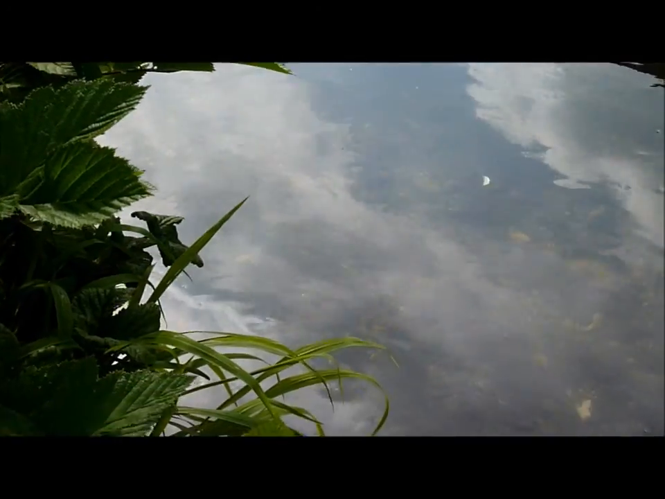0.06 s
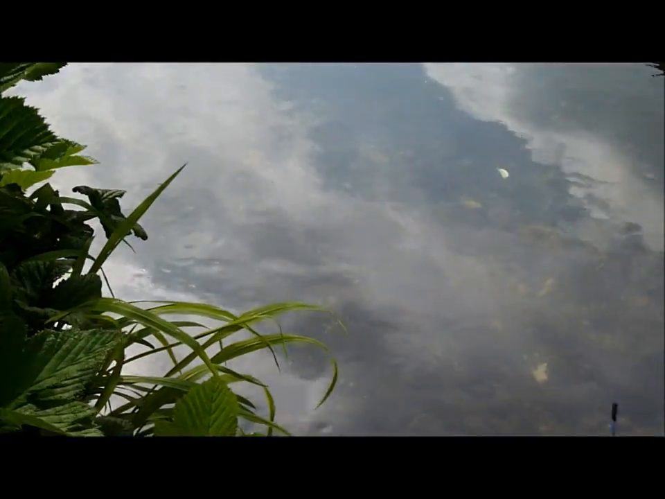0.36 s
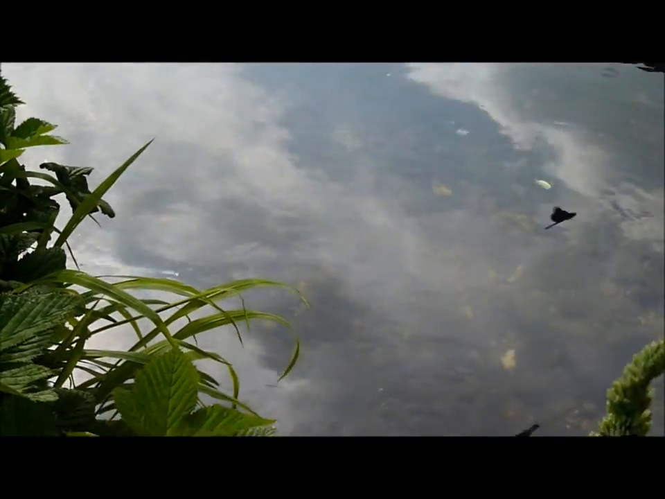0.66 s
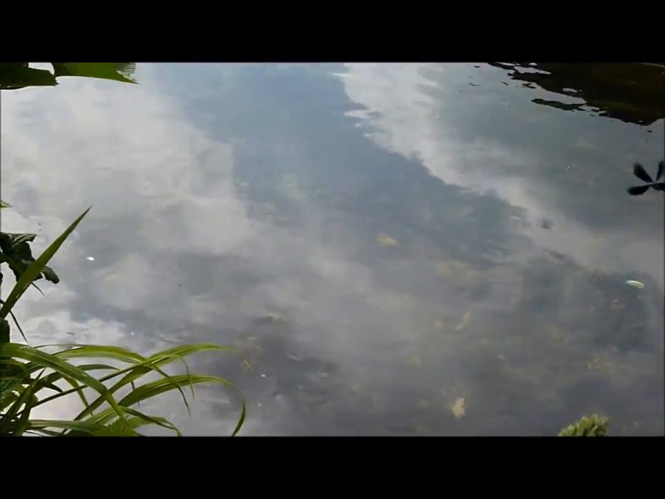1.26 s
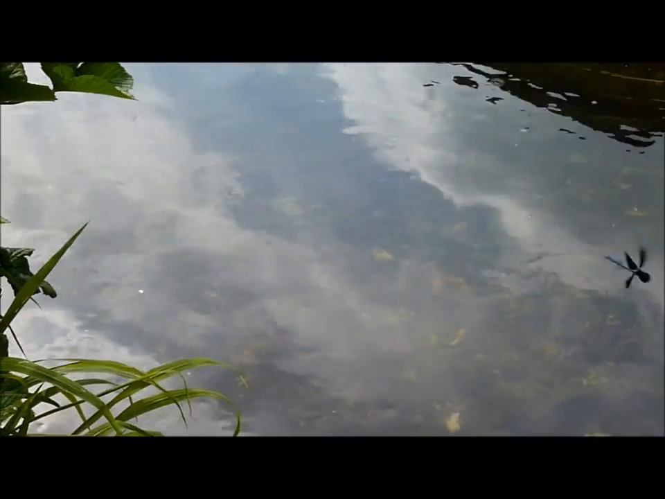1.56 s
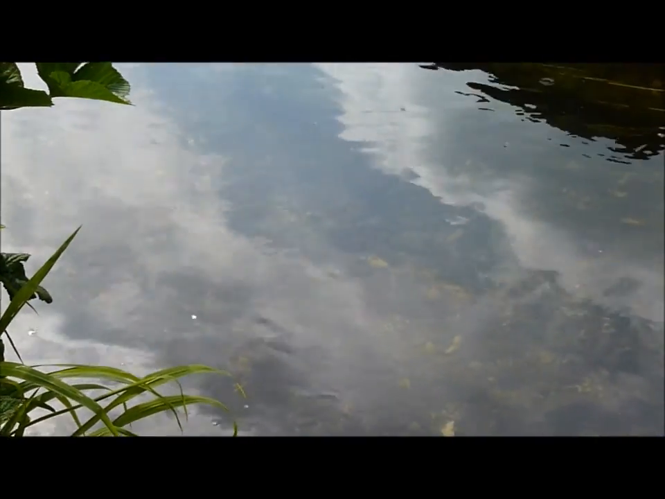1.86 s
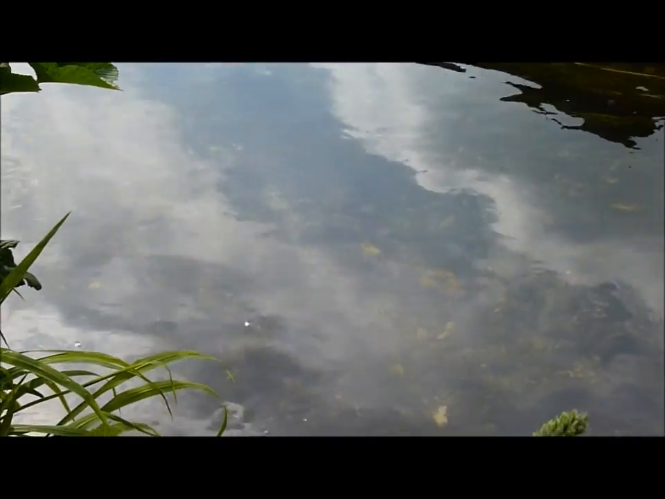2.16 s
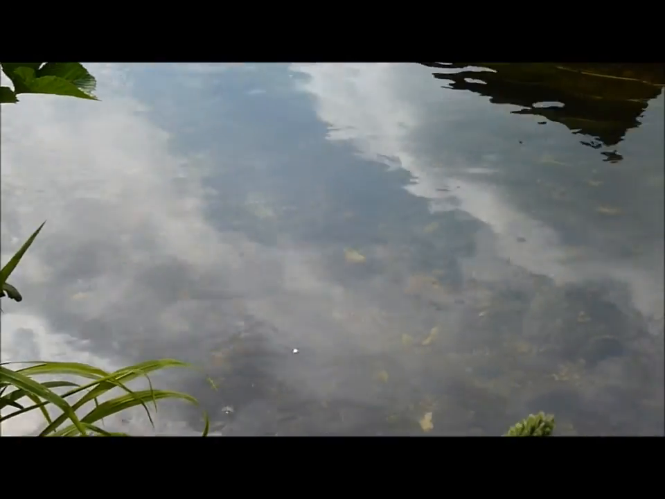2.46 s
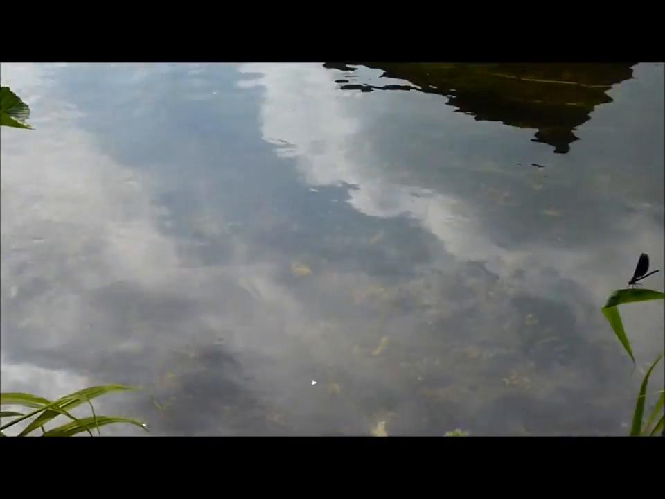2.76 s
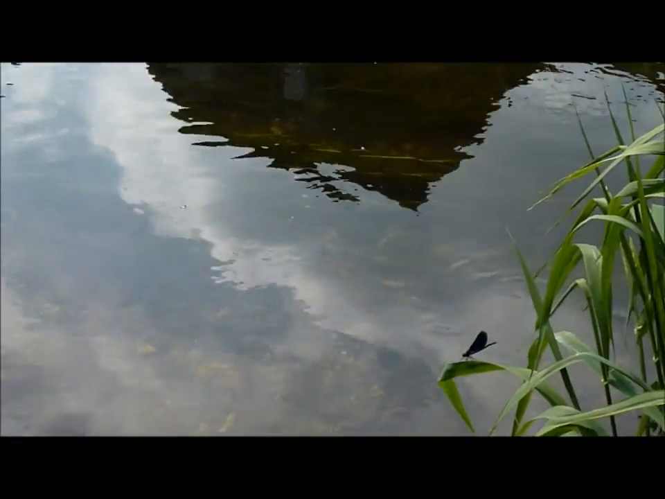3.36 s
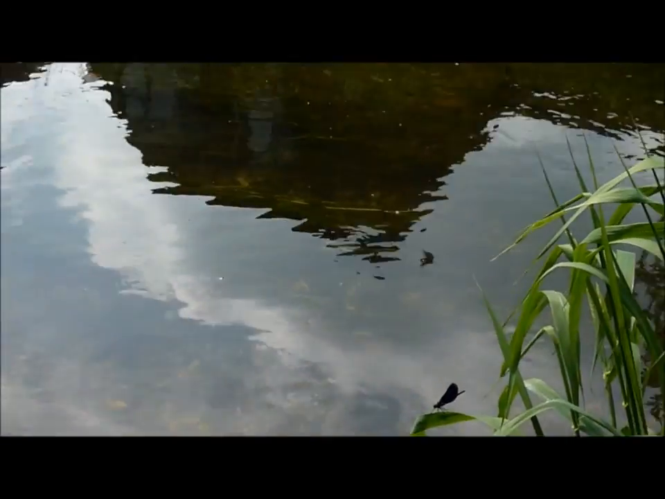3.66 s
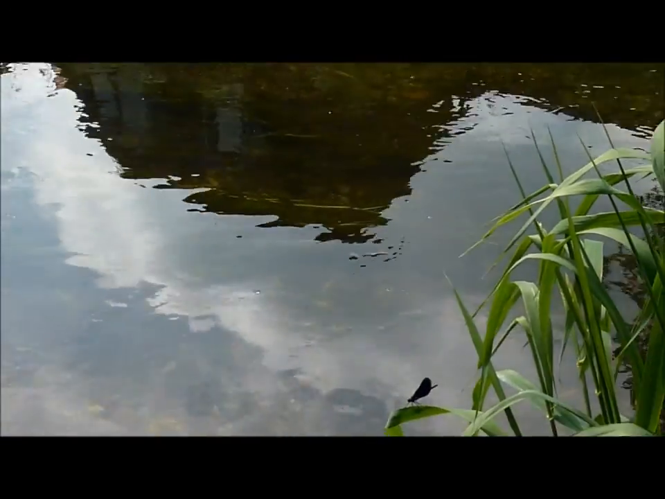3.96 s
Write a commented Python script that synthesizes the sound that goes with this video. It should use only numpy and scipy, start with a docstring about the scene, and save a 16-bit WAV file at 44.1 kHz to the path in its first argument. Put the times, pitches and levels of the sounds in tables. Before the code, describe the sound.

On a river bank, a songbird right of centre sings a held buzzy whistle and rapid falling notes over a low rush of water and far traffic. Afterwards twigs tick near the microphone and another bird chirps on the left.

```python
"""On a river bank: water and distant traffic rush throughout, and small birds call thinly from far off.
About a second in, a songbird right of centre gives a soft rising whistle, a long buzzing tone
and a run of quick falling notes, which echo from the trees and the far bank.
Then twigs tick close to the microphones, and just after three seconds a second bird chirps on the left."""
import sys
import numpy as np
from scipy import signal
from scipy.io import wavfile

SR = 44100
rng = np.random.default_rng(int(sys.argv[2]) if len(sys.argv) > 2 else 0)


def dump(signal):
    """Clip the signal to [-1, 1] and save it as 16-bit WAV at the path in sys.argv[1]."""
    limited = np.clip(np.atleast_2d(signal).T, -1, 1)
    pcm = np.round(limited * 32767).astype(np.int16)
    wavfile.write(sys.argv[1], SR, pcm)


N = 176400
T = np.arange(N) / SR


def from_db(db):
    """Decibels to gain."""
    return 10 ** (np.asarray(db) / 20)


def rms_one(x):
    """Scale to unit power."""
    return x / np.sqrt(np.mean(x ** 2) + 1e-20)


def in_time(rows):
    """Each column of a curve, read at every sample."""
    times, *columns = np.transpose(rows)
    return [np.interp(T, times, column) for column in columns]


def at_hz(points, hz):
    """Read a spectrum on a log-frequency axis."""
    f, value = np.transpose(points)
    return np.interp(np.log(hz), np.log(f), value)


def drift(rate_hz):
    """Smooth random wander with a spread of 1."""
    step, settle = 20, 2000
    pole = np.exp(-2 * np.pi * step * rate_hz / SR)
    white = rng.standard_normal(N // step + settle + 2)
    slow = signal.lfilter([1], [1, -2 * pole, pole * pole], white)[settle:]
    return np.interp(np.arange(N) / step, np.arange(len(slow)), rms_one(slow))


def band_pass(x, low_hz, high_hz):
    """Keep the band between two frequencies."""
    return signal.sosfilt(signal.butter(2, [low_hz, high_hz], "band", fs=SR, output="sos"), x)


def gate(start, end, edge_s=0.0016):
    """Open between two times, with short ramps."""
    return np.clip(np.minimum(T - start, end - T) / edge_s, 0, 1)


def sine(hz):
    """A tone of unit power on a moving pitch."""
    return np.sqrt(2) * np.sin(2 * np.pi * np.cumsum(hz) / SR)


def glide(rows, waver_hz):
    """A pure whistled note along a pitch and level curve."""
    hz, db = in_time(rows)
    return sine(hz + waver_hz) * from_db(db) * gate(rows[0][0], rows[-1][0])


def pan(x, pan_db, lead_s=0):
    """Place a sound: positive values make it louder and earlier at the left microphone."""
    gains = from_db(np.array([[pan_db], [-pan_db]]) / 2)
    left, right = np.broadcast_to(x, (2, N))
    return np.array([left, np.interp(T - lead_s, T, right)]) * gains / gains.mean()


def bank_echo(x, t60_s=0.72, delay_s=0.0089):
    """Diffuse echo from trees and banks, different at each microphone."""
    t = T[:SR]
    tails = rng.standard_normal((2, SR)) * from_db(-60 * t / t60_s) * (t > delay_s)
    tails /= np.sqrt(np.sum(tails ** 2, axis=1, keepdims=True))
    return signal.fftconvolve(np.atleast_2d(x), tails, axes=1)[:, :N]


def far_bank_slap(x, delay_s=0.115, level_db=-18):
    """One distinct echo from across the river, alike at both microphones."""
    return from_db(level_db) * np.interp(T - delay_s, T, x.mean(axis=0))


def rush(level_db=-44, flicker_db=0.85):
    """Water and far traffic: third-octave bands of noise, each flickering slightly."""
    # spectral density of the rush: f/Hz, relative level/dB
    spectrum = [(20, -19.5), (36, -0.5), (50, -0.5), (70, 3), (110, 0.5), (160, -3), (255, -1.5), (330, -9),
                (450, -7.5), (700, -7), (1000, -4.5), (1350, -8), (2000, -16), (3000, -25), (4500, -28.5),
                (6000, -29.5), (7200, -30.5), (8200, -52.5)]
    # likeness at the two microphones: f/Hz, correlation/0-1
    likeness = [(30, 0.99), (120, 1), (600, 0.96), (1400, 0.94), (3000, 0.23), (7000, 0.13)]
    out, edges_hz = 0, 20 * 2 ** (np.arange(28) / 3)
    white = rng.standard_normal((2, 2, N))
    for k, (low, high) in enumerate(zip(edges_hz, edges_hz[1:])):
        mid, side = band_pass(white[k % 2], low, high)
        hz = np.sqrt(low * high)
        alike = np.clip(at_hz(likeness, hz), 0, 1)
        gain = from_db(at_hz(spectrum, hz) + flicker_db * drift(4.5))
        out += gain * (np.sqrt(1 + alike) * mid + np.sqrt(1 - alike) * side * [[1], [-1]])
    return from_db(level_db) * rms_one(out)


def engines(waver_hz=2.4, flicker_db=1.3):
    """Distant engines: two low tones, unsteady in pitch and level."""
    # engine hum: t/s, f/Hz, level/dB
    hum = [(0, 124.5, -58.5), (.9, 122, -62), (1.25, 122.3, -53.5), (1.6, 118, -55.5), (2.15, 113, -59.5),
           (2.9, 108, -66), (3.4, 107.8, -51.5), (3.8, 111.2, -49.5), (4, 112, -63)]
    # higher drone that swells briefly: t/s, f/Hz, level/dB
    drone = [(.5, 250.9, -70), (1.25, 255, -56.5), (1.55, 264.7, -54), (1.75, 262.7, -66),
             (2.5, 262.3, -63), (4, 258, -66.5)]
    return sum(sine(hz + waver_hz * drift(8)) * from_db(db + flicker_db * drift(2.6))
               for hz, db in (in_time(hum), in_time(drone)))


def far_birds(quaver_hz=110.3, flicker_db=3):
    """Small birds far off to the left: thin, broken, quavering calls, heard largely as echo."""
    # one curve a call: t/s, f/Hz, level/dB
    curves = [
        [(0, 7150, -64.5), (.12, 7030, -65), (.33, 6730, -68), (.65, 6600, -66.5)],
        [(1.0, 7520, -63), (1.1, 7130, -64.5), (1.4, 7250, -67.5), (1.48, 7340, -66)],
        [(1.57, 7300, -66), (1.61, 7260, -62), (1.64, 7200, -65.5)],
        [(2.25, 6960, -66), (2.4, 6920, -71.5), (2.52, 6720, -72)],
        [(2.69, 6900, -65), (2.74, 6780, -72), (2.79, 6570, -65)],
        [(2.8, 7570, -70), (2.88, 7250, -60), (2.94, 6940, -66.5)],
        [(2.99, 7340, -67), (3.03, 7100, -61), (3.07, 7090, -71)],
        [(3.09, 7400, -70), (3.13, 7250, -59), (3.16, 7200, -59)],
        [(3.22, 7620, -57), (3.25, 7300, -68), (3.275, 7200, -59)],
        [(3.335, 7510, -59.5), (3.37, 7270, -62.5), (3.4, 7200, -61)],
        [(3.78, 7150, -66), (3.85, 7040, -70.5), (4, 7050, -73.5)],
    ]
    quaver = quaver_hz * drift(60)
    calls = sum(glide(curve, quaver) for curve in curves) * from_db(flicker_db * drift(22))
    return pan(from_db(-1.5) * calls + from_db(-3) * bank_echo(calls), pan_db=5, lead_s=45e-6)


def twigs(decay_s=0.002):
    """Tiny dry snaps in the plants close to the microphones."""
    # twig ticks: t/s, level/dB, left minus right/dB
    ticks = [(2.581, -39.5, -3), (2.945, -42, -4), (3.421, -53, -3), (3.561, -50, -1), (3.778, -41, -7)]
    envelope = sum(pan(from_db(db) * (T >= start) * np.exp(-np.abs(T - start) / decay_s), pan_db)
                   for start, db, pan_db in ticks)
    crack = band_pass(rng.standard_normal((2, N)), 1800, 8000)
    return envelope * rms_one(crack)


def second_bird(rasp_hz=110):
    """One chirp of three quick, slightly rough whistled strokes."""
    # one curve a stroke: t/s, f/Hz, level/dB
    strokes = [
        [(3.14, 5320, -55), (3.149, 6200, -61.5), (3.156, 6150, -50)],
        [(3.159, 5300, -58), (3.165, 4534, -52), (3.172, 3950, -53)],
        [(3.191, 4050, -58), (3.207, 4430, -44.5), (3.214, 5040, -51), (3.219, 3970, -50), (3.228, 3520, -50)],
    ]
    return sum(glide(stroke, rasp_hz * drift(400)) for stroke in strokes)


def opening_whistle(rasp_hz=220, waver_hz=6):
    """The songbird starts with two soft raspy notes that overlap a rising whistle."""
    # one curve a soft note: t/s, f/Hz, level/dB
    soft_notes = [
        [(.94, 2200, -61.5), (.967, 2780, -61), (.98, 2300, -68)],
        [(.995, 2250, -61), (1.022, 2780, -61.5), (1.04, 2200, -53)],
    ]
    # rising whistle: t/s, f/Hz, level/dB
    whistle = [(.98, 1884, -66), (1.01, 1890, -57.5), (1.06, 1942, -62.5), (1.12, 2066, -53),
               (1.18, 2090, -45.5), (1.215, 2097, -52.5), (1.28, 2096, -58.5)]
    rasp = rasp_hz * drift(280)
    return glide(whistle, waver_hz * drift(40)) + sum(glide(note, rasp) for note in soft_notes)


def long_tone(buzz_hz=98, swing_hz=75.2, split_start_s=1.66, split_below_hz=185):
    """The songbird's held whistle buzzes as pitch and level flutter, and splits in two near its end."""
    # held tone: t/s, f/Hz, level/dB, buzz depth/0-1
    tone = [(1.305, 2260, -63, 0.2), (1.345, 2657, -45, 0.4), (1.385, 2680, -41, 0.67),
            (1.43, 2717, -42, 0.44), (1.485, 2670, -39.5, .15), (1.515, 2650, -42, .5),
            (1.61, 2618, -41, .65), (1.665, 2575, -38, 0.58), (1.698, 2564, -40.5, 0.64),
            (1.716, 2290, -48, 0.2)]
    start, end = tone[0][0], tone[-1][0]
    hz, db, depth = in_time(tone)
    flutter = sine(buzz_hz * (1 + 0.013 * drift(7.4))) / np.sqrt(2)
    pitch = hz + swing_hz * depth * flutter + 14 * drift(57)
    level = from_db(db + 0.79 * drift(40)) * (1 + depth * flutter)
    split = from_db(-12.5) * sine(pitch - split_below_hz) * gate(split_start_s, end)
    overtone = from_db(-31.5) * sine(2 * pitch)
    return level * gate(start, end) * (sine(pitch) + split + overtone)


def quick_notes(drop_s=0.0038, sag_hz_per_s=4000, hook_hz=1300, hook_s=0.0045):
    """The songbird's run: all notes hook down at the end; slurred ones first drop, weaken and sag."""
    # notes: start t/s, length/s, middle f/Hz, opening drop/Hz, level/dB
    notes = [(1.815, 0.038, 3410, -3, -52), (1.855, 0.049, 3450, 602, -53),
             (1.907, .045, 3570, 905.5, -50.5), (1.949, 0.048, 3575, 650, -52.5),
             (1.999, .045, 3640, 792, -54.5), (2.05, 0.049, 3720, 299, -54), (2.103, 0.045, 3570, -2, -58)]
    dip_db, dip_at_s, dip_width_s = 7, 0.016, 0.0099
    out, waver = 0, 25 * drift(150)
    for start, length, hz, drop_hz, db in notes:
        t = np.clip(T - start, 0, length)
        slurred = drop_hz > 0
        drop = drop_hz * np.exp(-t / drop_s)
        sag = sag_hz_per_s * (t - length / 2) * slurred
        hook = hook_hz * np.exp((t - length) / hook_s)
        dip = dip_db * np.exp(-((t - dip_at_s) / dip_width_s) ** 2) * slurred
        level = from_db(db - dip) * gate(start, start + length, edge_s=0.0045)
        out += level * sine(hz + drop - sag - hook + waver)
    return out


def pips(width_s=0.007, bend_hz=693, rasp_hz=262, lead_in_rasp_hz=305):
    """The songbird's upper voice dips in a short scratchy V between the quick notes."""
    # high lead-in to the first pip: t/s, f/Hz, level/dB
    lead_in = [(1.805, 6530, -63), (1.825, 6830, -55), (1.838, 7100, -51.5), (1.85, 6300, -54)]
    # bottom of each V: t/s, f/Hz, level/dB
    dips = [(1.852, 6170, -44.5), (1.903, 6450, -46.5), (1.951, 6720, -48), (1.998, 6700, -51),
            (2.047, 6720, -50), (2.096, 6750, -57.5)]
    out = glide(lead_in, lead_in_rasp_hz * drift(260))
    rasp = rasp_hz * drift(500)
    scratch = from_db(-11) * rms_one(band_pass(rng.standard_normal(N), 2600, 8000))
    for centre, hz, db in dips:
        away = np.minimum(np.abs(T - centre) / width_s, 2)
        voice = sine(hz + bend_hz * away ** 2 + rasp) * np.exp(-2 * away ** 2)
        out += (voice + scratch * np.exp(-away ** 2)) * from_db(db) * (away < 2)
    return out


def scene():
    """The birds, their echoes and the river bank as they reach the microphone pair."""
    song = pan(opening_whistle(), pan_db=-2) + pan(long_tone(), pan_db=-6, lead_s=-12e-6)
    run = pan(quick_notes() + pips(), pan_db=-6.5, lead_s=-31e-6)
    chirp = second_bird()
    echo = bank_echo(from_db(-15) * song + from_db(-5) * run + from_db(-9.5) * chirp)
    echo += far_bank_slap(song + run)
    surroundings = far_birds() + twigs() + rush() + engines()
    return surroundings + echo + pan(chirp, pan_db=11) + song + run


def record(dry):
    """The recorder has a narrow notch in the treble, then rolls off to a low cut-off."""
    notch_hz, notch_width_hz, roll_off_hz, cutoff_hz = 5420, 420, 7500, 8050
    notched = signal.lfilter(*signal.iirnotch(notch_hz, notch_hz / notch_width_hz, fs=SR), dry)
    dulled = signal.sosfilt(signal.butter(16, roll_off_hz, fs=SR, output="sos"), notched)
    return signal.sosfilt(signal.ellip(10, .3, 80, cutoff_hz, fs=SR, output="sos"), dulled)


dry = scene()
out = record(dry)
dump(out)
```